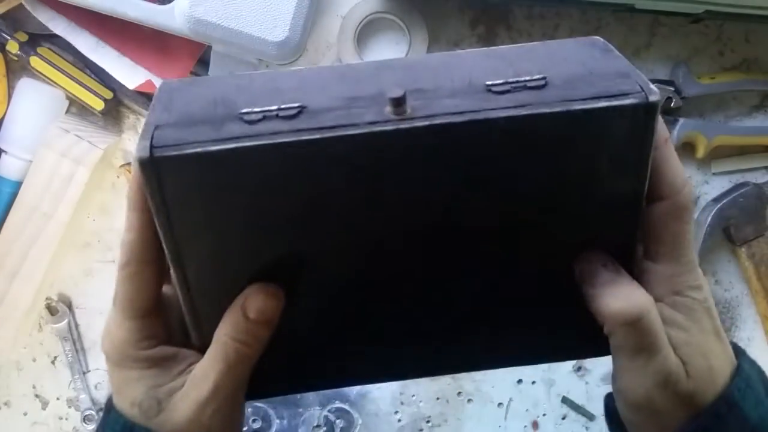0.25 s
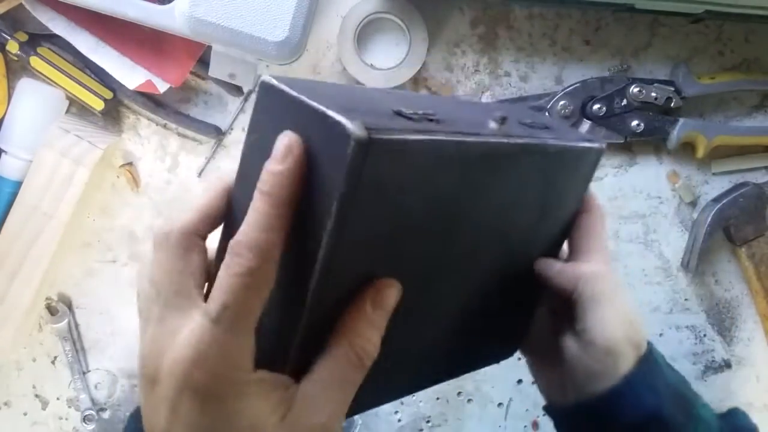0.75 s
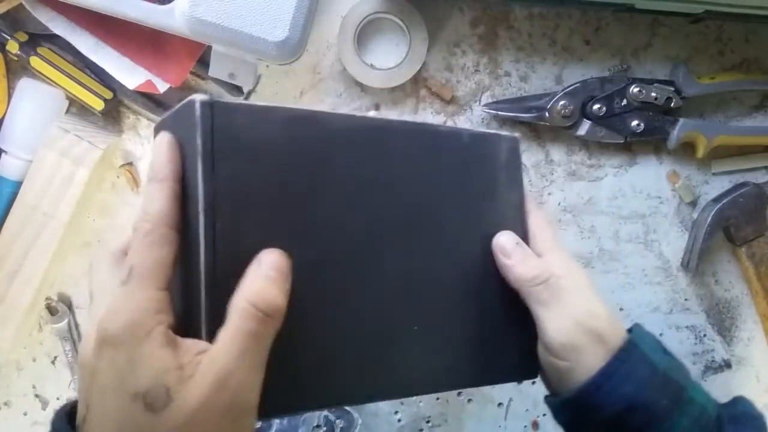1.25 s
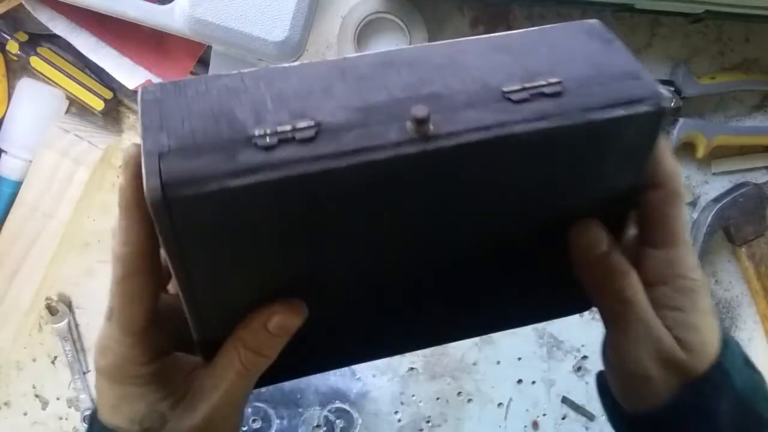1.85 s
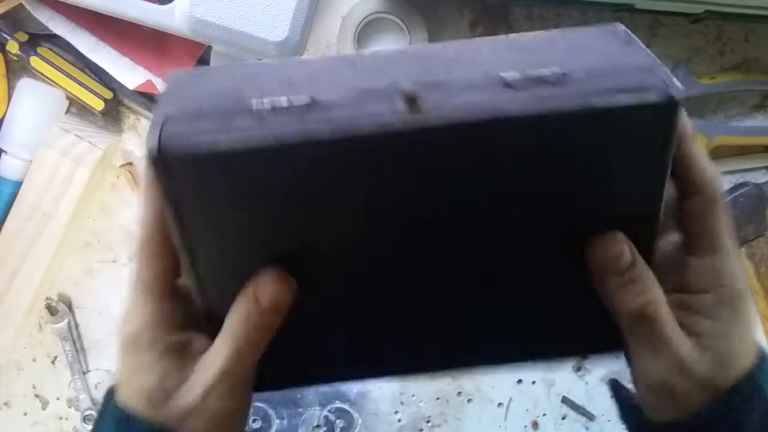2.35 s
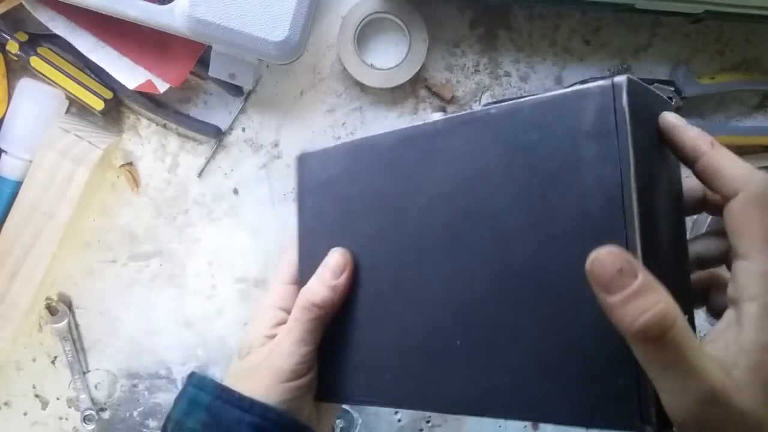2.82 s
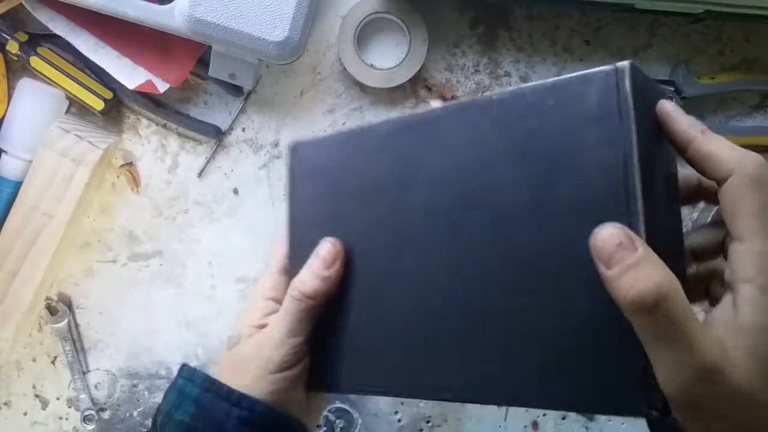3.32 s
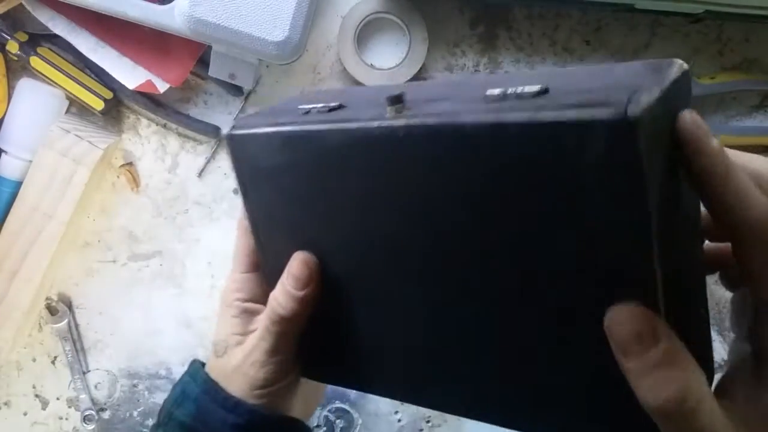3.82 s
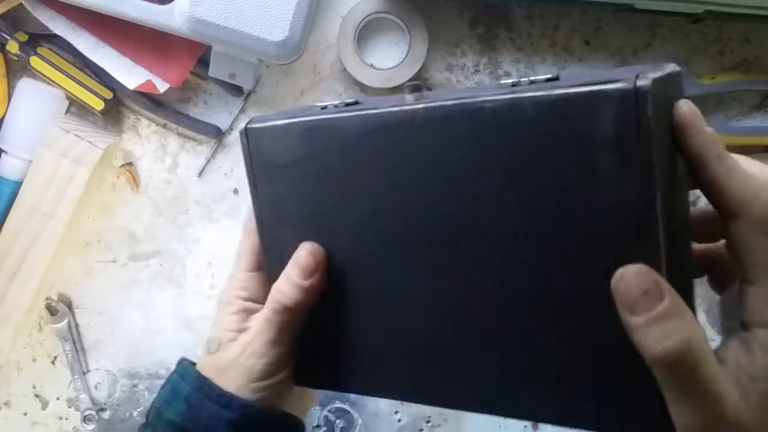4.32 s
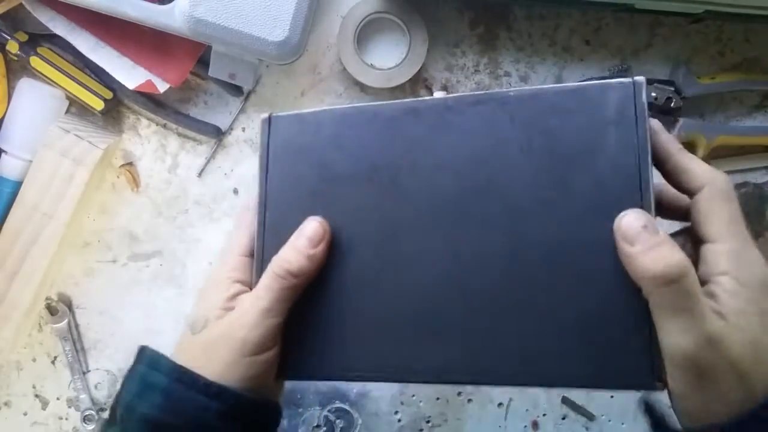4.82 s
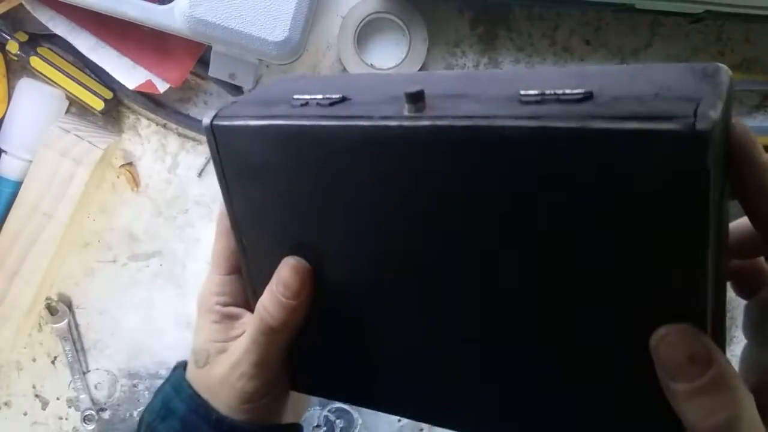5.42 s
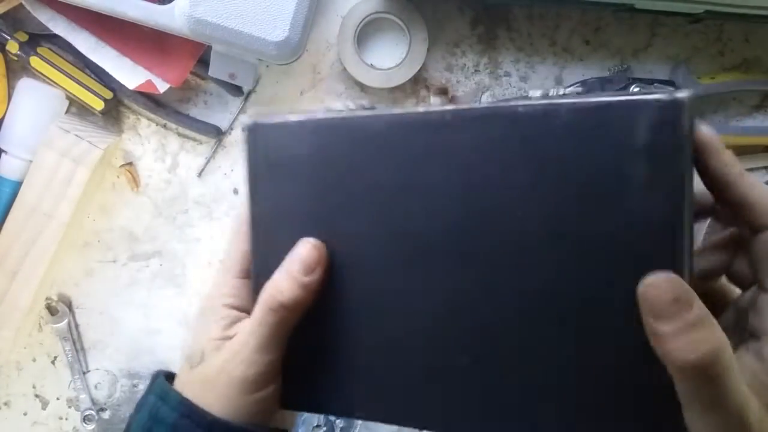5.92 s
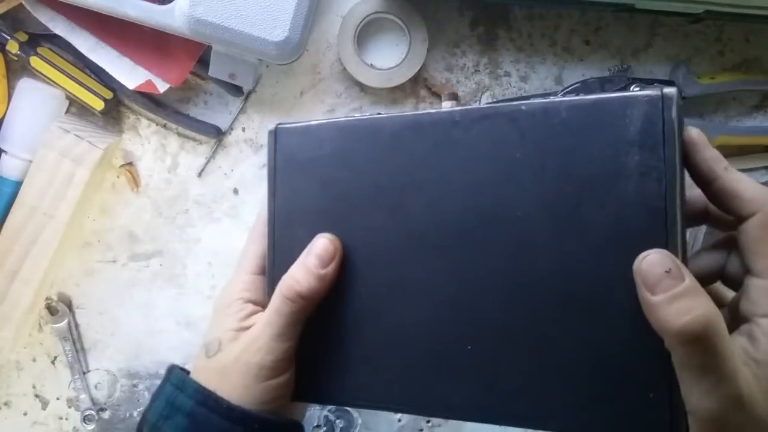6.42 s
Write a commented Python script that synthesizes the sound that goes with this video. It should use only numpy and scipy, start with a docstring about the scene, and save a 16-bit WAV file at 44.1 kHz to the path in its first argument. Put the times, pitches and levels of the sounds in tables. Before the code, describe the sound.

Close, dry woody clicks and short rumbling rolls of a little ball inside a tilted wooden box, with brief pauses and faint finger bumps.

```python
"""A fine rattle and woody clicks: a small ball runs through a maze in a wooden box tilted by two hands.
Contacts are bursts shaped by the struck spot, the panels and the hollow; rolling is a run of tiny taps.
Fingers bump the shell (decaying low tones and noise) and rub it (narrow-band noise).
Behind lie the quiet noise and weak hum of a workshop; near mono, with a mild noise suppressor."""
import sys
import numpy as np
from scipy import signal
from scipy.fft import rfft, irfft, next_fast_len
from scipy.io import wavfile
from scipy.ndimage import uniform_filter1d, map_coordinates

SR = 44100
rng = np.random.default_rng(int(sys.argv[2]) if len(sys.argv) > 2 else 0)


def inscribe(sig):
    """Save sig as 16-bit PCM at rate SR to the path in sys.argv[1].

    A 1-D sig is mono; a 2-D sig holds one channel per row.
    Samples are clipped to [-1, 1] before scaling.
    """
    pcm = np.round(np.clip(np.atleast_2d(sig).T, -1, 1) * 32767)
    wavfile.write(sys.argv[1], SR, pcm.astype(np.int16))


N = 293706
TIME = np.arange(N) / SR


def amp(db):
    """Amplitude factor of a level in dB."""
    return 10 ** (np.asarray(db) / 20)


def unit(x):
    """x scaled to an RMS of 1."""
    return x / np.sqrt(np.mean(x ** 2) + 1e-20)


def along(points, hz):
    """Interpolate (Hz, value) points on a log frequency axis."""
    point_hz, values = np.transpose(points)
    return np.interp(np.log(hz + 1), np.log(point_hz + 1), values)


def filtered(x, gain):
    """x times a gain that depends on frequency."""
    size = next_fast_len(len(x) + SR // 8)
    spectrum = rfft(x, size) * gain(np.fft.rfftfreq(size, 1 / SR))
    return irfft(spectrum, size)[:len(x)]


def causal(gain):
    """The minimum-phase response with this gain: it rings only after the blow."""
    cepstrum = irfft(np.log(np.maximum(gain, 1e-6)))
    half = len(cepstrum) // 2
    cepstrum[1:half] *= 2
    cepstrum[half + 1:] = 0
    return np.exp(rfft(cepstrum))


def wobble(knots_per_s):
    """A smooth random curve through normally distributed knots."""
    coarse_s = TIME[::32]
    knots = rng.standard_normal(int(N * knots_per_s / SR) + 4)
    return np.interp(TIME, coarse_s, map_coordinates(knots, [coarse_s * knots_per_s]))


def add(track, start_s, sound):
    """Lay a sound into the track at start_s."""
    part = track[max(round(start_s * SR), 0):][:len(sound)]
    part += sound[:len(part)]


def scatter(t, rise_s, life_s):
    """A blow spread by quick reflections in the wood: a short burst with a nearly even spectrum."""
    attack = 1 - np.exp(-t / rise_s)
    burst = rng.standard_normal(len(t)) * attack * np.exp(-t / life_s)
    spectrum = rfft(burst)
    even = irfft(spectrum / (abs(spectrum) + 1e-9) ** .7)
    even *= attack * np.exp(-(t / (4 * life_s)) ** 2)
    return even / np.linalg.norm(even)


def resonance(hz, centre_hz, width_hz, db):
    """A peak or dip of db over a flat response."""
    return 1 + (amp(db) - 1) / (1 + (2 * (hz - centre_hz) / width_hz) ** 2)


# Resonances of the panels and hollow. Each row: centre in Hz, width in Hz, nominal peak or dip in dB.
BOX_MODES = [(116, 40, 6.5), (393, 16, 2.5), (494, 40, 0.5), (603, 38, 1.5), (790, 35, 2.5), (900, 39, 6),
             (998, 95, 6), (1165, 100, -2.5), (1290, 77, 7), (1472, 75, 10), (1645, 90, -4.5),
             (1787, 90, 8.5), (2097, 98, 6.5), (2210, 33, 6.5), (2470, 52, 6.5), (2760, 90, 6.5),
             (2990, 110, -6.5), (3220, 150, 4.5), (3710, 480, 7), (4370, 140, 9.5), (4610, 160, 4.5),
             (4940, 160, 7), (5480, 120, 6.5), (5720, 140, -6.5), (5900, 350, 5.5)]


def box(hz):
    """Gain of the box: the product of its resonances, lowered by 3 dB."""
    return np.prod([resonance(hz, *mode) for mode in BOX_MODES], axis=0) * amp(-3.0)


# The ball strikes wood. Each row: first contact in seconds, level in dB, knock (near 1 kHz) in dB and
# hardness (near 6.5 kHz) in dB, both relative to the 2.4 kHz clack before the resonances,
# ring of the struck spot in Hz, rebounds (rounded), first flight in seconds.
STRIKES = [ (0.1404, -50.5, -2, -30.5, 2480, 1, .022), (0.251, -26.5, -7, -18, 2540, 3, .0366),
           (0.389, -50, 5, -36, 2490, 0, 0), (0.4078, -34.5, -7, -25, 2520, 0, 0),
           (0.427, -45, 8, -26, 2530, 1, .014), (0.4886, -47, -1.5, -36, 2520, 1, .042),
           (1.4056, -53, -4, -38, 1410, 0, 0), (1.4598, -45.5, -5.5, -35.5, 1460, 0, 0),
           (1.4928, -41, -5, -36, 1900, 1, .02), (1.5501, -36, -.5, -2.5, 3560, 0, 0),
           (1.5754, -34, -6, -31, 2336, 2, .0183), (1.7892, -53.5, -2.5, -36, 2530, 1, .038),
           (1.94, -27.5, -7.5, -14, 2520, 0, 0), (1.9745, -35, 0, -27, 3160, 2, .0224),
           (2.0792, -32, -4.5, -21, 2552, 0, 0), (2.159, -40, -2.5, -27, 2510, 2, .0454),
           (2.5842, -46.5, 5, -13, 3350, 0, 0), (3.006, -47.5, 0, -37, 2200, 0, 0),
           (3.0705, -40.5, 0, -20, 2200, 0, 0), (3.133, -28, -11, -9, 3300, 1, .0837),
           (3.1559, -44, -1, -30, 1550, 0, 0), (3.1876, -42.5, -5.5, -31, 1560, 0, 0),
           (3.2802, -39, -5.5, -17.5, 2120, -0.5, 0), (3.3575, -37.5, -2, -24.5, 2650, 0, 0),
           (3.3871, -47, 0, -26, 1260, 0, 0), (3.398, -30, -9, -4, 3940, 0, 0),
           (3.432, -42.5, -1.5, -17, 2630, 1, .0104), (3.517, -42.5, -2, -6.5, 3440, 2, .0664),
           (3.5437, -44.5, -1.5, -21, 2530, 0, 0), (3.92, -46.5, 3.5, -29.5, 2050, 0, 0),
           (3.9412, -34.5, -6, -13, 2440, 1, .0257), (4.04, -46, 1.5, -23, 1390, 0, 0),
           (4.0475, -34, -11.5, -11, 2630, 0, 0), (4.0851, -25, -6.5, -2, 6000, 0, 0),
           (4.1089, -35, -6, -27, 2440, 0, 0), (4.118, -25.5, -8, -14.5, 2444, 0, 0),
           (4.178, -32, -7, -5.5, 6030, 0, 0), (4.2648, -39, -1.5, -6, 2300, 1, .0532),
           (4.3355, -41.5, -1.5, -20.5, 2550, 1, .02), (4.6868, -44, -2, -43, 2080, 0, 0),
           (4.7365, -40.5, -3, -16, 3140, -0.5, 0), (4.7574, -36.5, -2.5, -29, 2060, 0, 0),
           (4.8205, -52.5, 1, -22, 1240, 0, 0), (4.87, -36.5, -3, -26, 1690, 1, .0157),
           (4.9207, -38.5, -1.5, -7, 1900, 2, .021), (4.963, -45, -6, -22, 1340, 1, .032),
           (5.0372, -43.5, 2.5, -10.5, 3040, 1, .011), (5.142, -55.5, 9, -35, 1760, 1, .026),
           (5.546, -49.5, -2, -34, 1610, 1, .008), (5.605, -51.5, -1.5, -44, 1420, 0, 0),
           (5.6673, -42, 1, -31.5, 2700, 0, 0), (5.693, -42, 0, -16, 2700, 0, 0),
           (5.6992, -30, -5, -8, 4700, 0.5, 0), (5.7252, -33.5, -2, -20, 2720, 0, 0),
           (5.7455, -38.5, -.5, -27, 2700, 0, 0), (5.7635, -44, -2, -15, 3650, 0, 0),
           (5.7987, -50, 3, -24, 2680, 0, 0), (5.9048, -41, 0, -11, 1890, 2, .019),
           (6.1835, -54.5, 1.5, -32, 1790, 0, 0), (6.3578, -39, 0, -5, 3080, 1.5, .0125),
           (6.594, -50, 4.5, -12.5, 1840, 1, 0)]
RESTITUTION, BOUNCE_LOSS_DB = .59, 5.5  # each flight over the one before; level lost a bounce
WALL_FLIGHT_S, WALL_SOFTENING_DB = .05, 2.5  # shortest first flight to the wall; hardness lost a return
DROP_S, DROP_LOSS_DB = .023, 14.5  # fall from the wall back to the floor
FLOOR_KNOCK_DB, FLOOR_HARDNESS_DB, FLOOR_RING_HZ = -2, -30.5, 1527
HOP_WANDER_OCT = .2  # each hop lands on another spot: spread of its ring


def contacts():
    """Rebounds at shrinking intervals: long flights return to the wall, short ones hop on the floor.

    Rows: seconds, dB, knock dB, hardness dB, ring Hz.
    """
    rows = []
    for start_s, db, knock_db, hardness_db, ring_hz, rebounds, flight_s in STRIKES:
        hopping = round(rebounds) > 0 and flight_s < WALL_FLIGHT_S
        for k in range(round(rebounds) + 1):
            when_s = start_s + flight_s * (1 - RESTITUTION ** k) / (1 - RESTITUTION)
            level_db = db - BOUNCE_LOSS_DB * k
            if hopping and k > 0:
                hop_hz = ring_hz * 2 ** (HOP_WANDER_OCT * rng.standard_normal())
                rows.append((when_s, level_db, FLOOR_KNOCK_DB, FLOOR_HARDNESS_DB, hop_hz))
            else:
                softened_db = hardness_db - WALL_SOFTENING_DB * k
                rows.append((when_s, level_db, knock_db, softened_db, ring_hz))
            if not hopping:
                rows.append((when_s + DROP_S, level_db - DROP_LOSS_DB,
                             FLOOR_KNOCK_DB, FLOOR_HARDNESS_DB, FLOOR_RING_HZ))
    return rows


# Decay of the hollow. Each row: frequency in Hz, time to fall 60 dB in seconds.
HOLLOW_DECAY = [(150, 0.1), (600, .15), (1500, 0.084), (3000, 0.09), (6000, .11), (12000, 0.14)]


def afterring(size):
    """The hollow box and the bench answer; each frequency dies at its own speed."""
    hz, t, bins = signal.stft(rng.standard_normal(size), SR, nperseg=256)
    decay = amp(-60 * t / along(HOLLOW_DECAY, hz)[:, None])
    tail = signal.istft(bins * decay, SR, nperseg=256)[1][:size]
    tail *= 1 - np.exp(-np.arange(size) / SR / 0.0044)
    return tail / np.linalg.norm(tail)


# Harder contacts are brighter. Each row: hardness in dB, colour at 4.3 kHz in dB.
EDGE_BY_HARDNESS = [(-36.5, -22.5), (-32.5, -14), (-22, -4.5), (0, -3)]
# Crack of a contact. Each row: hardness in dB, crack in dB over the contact level, before its filter.
CRACK_BY_HARDNESS = [(-30, -16), (-15, -3), (-7.5, 9.5), (-2, 0)]


def clicks(size=5120):
    """Each contact rings the struck spot and then the whole box; harder contacts are brighter."""
    track, t, hz = np.zeros(N), np.arange(size) / SR, np.fft.rfftfreq(size, 1 / SR)
    body = box(hz)
    panels = causal(body ** .75)
    hollow_colour = [(90, 1.5), (250, -2.5), (700, -3.5), (1500, -3), (3000, -5), (7000, -9.5), (12000, -3)]
    hollow = causal(body * amp(along(hollow_colour, hz)))
    treble = causal(amp(along([(6000, -19.5), (10000, 0.5), (13000, 0.5), (16000, -2)], hz)))
    for start_s, db, knock, hardness, ring_hz in contacts():
        edge = np.interp(hardness, *np.transpose(EDGE_BY_HARDNESS))
        boom = knock / 2 - 11 - 0.25 * (db + 34.0)  # the low boom grows more slowly than the clack
        colour = [(35, -43.0), (85, boom), (220, boom - 3), (480, knock - 2), (950, knock),
                  (1200, knock / 2 - 3), (1700, -3.5), (2400, 0), (4300, edge), (6500, hardness),
                  (8200, hardness - 4.5), (10000, -32 + hardness / 5), (15500, -33 + hardness / 5)]
        spot = causal(amp(along(colour, hz)) * resonance(hz, ring_hz, width_hz=290, db=8.5))
        blow = irfft(rfft(scatter(t, rise_s=0.00044, life_s=0.0033)) * spot * panels)
        tail = irfft(rfft(afterring(size)) * spot * hollow)
        contact = blow + tail
        attack_rms = np.sqrt(np.mean(contact[:SR // 125] ** 2))  # first 8 ms
        add(track, start_s, amp(db) * contact / attack_rms)
        crack_db = db + np.interp(hardness, *np.transpose(CRACK_BY_HARDNESS))
        crack = irfft(rfft(scatter(t, rise_s=.0001, life_s=.0007)) * treble)
        add(track, start_s, amp(crack_db) * crack)
    return track


def rattle(colour, hops_per_s, spread_db, smooth, woody):
    """The ball hops over the wood grain: a run of tiny taps of uneven size and spacing into the box."""
    size = 2 * next_fast_len(N // 2 + SR // 8)
    hz = np.fft.rfftfreq(size, 1 / SR)
    hop_count = np.cumsum(hops_per_s * amp(3 * wobble(90))) / SR
    hops = np.diff(np.floor(hop_count), prepend=0)
    tap_sizes = amp(spread_db * np.clip(rng.standard_normal(N), -2, 2))
    taps = hops * tap_sizes * np.sign(rng.standard_normal(N))
    drive = unit(taps) + smooth * rng.standard_normal(N)
    # the floor panel spreads each tap over a few milliseconds without changing its colour
    burst = scatter(np.arange(2 * (SR // 60)) / SR, rise_s=.0004, life_s=.0013)
    spread = np.exp(1j * np.angle(rfft(burst, size)))
    response = causal(amp(along(colour, hz)) * box(hz) ** woody)
    return unit(irfft(rfft(drive, size) * spread * response)[:N])


# Colour of the rumble before the box. Each row: frequency in Hz, relative level in dB.
RUMBLE_COLOUR = [(40, -28.5), (90, -1.5), (250, -10), (500, 0.5), (1000, 0), (1600, -1), (2200, -7),
                 (3000, -16), (5000, -42), (9000, -63.5)]
# Colour of the rasp before the box. Each row: frequency in Hz, relative level in dB.
RASP_COLOUR = [(1500, -43.5), (2500, 3), (3200, -2.5), (4300, -17.5), (5500, -24.5), (9000, -44)]
# Each tilt sends the ball down a corridor. Each row: start in seconds, top speed in seconds,
# stop in seconds, rolling in dB, rasp in dB, low hollow tone in Hz, high hollow tone in Hz.
TILTS = [ (.07, .18, .345, -52, -62, 540, 915), (1.288, 1.468, 1.62, -52.5, -66, 765, 2300),
         (1.749, 1.86, 2.13, -59, -70.5, 532, 2486), (2.9, 3.01, 3.32, -53.5, -85, 339, 1617),
         (3.805, 3.928, 4.21, -53, -73, 1327, 2163), (4.61, 4.722, 4.78, -57.5, -80, 1406, 2088),
         (5.413, 5.676, 5.8, -55, -72, 1080, 1340), (5.97, 6.3, 6.41, -61.5, -81.5, 990, 1220)]
SPEED_POWER, COAST_DB_PER_S, STOP_S = 0.93, 8.5, .03  # loudness over speed; fade after top; time to halt


def rolling():
    """The ball gathers speed evenly as the box tips, coasts with a slow fade and comes to rest."""
    level, rasp, t = np.zeros(N), np.zeros(N), np.arange(SR) / SR
    for start_s, top_s, stop_s, roll_db, rasp_db, _, _ in TILTS:
        gathering = np.clip(t / (top_s - start_s), 0, 1)
        stopping = np.clip((stop_s - start_s - t) / STOP_S + .5, 0, 1)
        coasting = amp(-COAST_DB_PER_S * np.maximum(start_s + t - top_s, 0))
        motion = (gathering * stopping) ** SPEED_POWER * coasting
        add(level, start_s, motion * amp(roll_db))
        add(rasp, start_s, motion * amp(rasp_db))
    rumble = rattle(RUMBLE_COLOUR, hops_per_s=105, spread_db=3.3, smooth=.15, woody=1.1)
    return level * rumble + rasp * rattle(RASP_COLOUR, hops_per_s=90, spread_db=2.5, smooth=.3, woody=0.82)


LOW_TONE_DB, HIGH_TONE_DB = 7.5, 4.5  # boost of a corridor's two hollow tones


def corridors(ball, width_hz):
    """The corridor that the ball is in rings along with it until the next tilt."""
    voiced = ball.copy()
    ends_s = [row[0] for row in TILTS[1:]] + [N / SR]
    for (start_s, *_, low_hz, high_hz), end_s in zip(TILTS, ends_s):
        inside = ball[max(round(start_s * SR), 0):round(end_s * SR)]
        for hz, db in (low_hz, LOW_TONE_DB), (high_hz, HIGH_TONE_DB):
            tone = signal.lfilter(*signal.iirpeak(hz, hz / width_hz, SR), inside)
            add(voiced, start_s, (amp(db) - 1) * tone)
    return voiced


def squeak(centre_hz, size):
    """Skin dragging on the shell: a narrow, breathy tone."""
    half_width_hz = 0.028 * centre_hz + 20
    noise = rng.standard_normal(size)
    return unit(filtered(noise, lambda hz: 1 / (1 + ((hz - centre_hz) / half_width_hz) ** 2)))


# The shell under a soft finger. Each row: tone in Hz, relative level in dB.
SHELL_TONES = [(110, -7.5), (161, -3), (294, 1), (420, -7)]
# Fingers bump the shell. Each row: start in seconds, nominal level in dB.
BUMPS = [(0.557, -53.5), (0.782, -55), (1.051, -44), (3.073, -42)]
# Fingers slide on the shell. Each row: start in seconds, end in seconds, main squeak in dB, its centre in Hz.
RUBS = [(2.45, 2.58, -68, 2480), (2.71, 2.86, -67.5, 600)]
# Further squeaks of the skin. Each row: centre in Hz, level in dB relative to the main squeak.
WHISTLES = [(1960, -12), (3840, -7.5), (4800, -16)]


def hands():
    """Finger bumps sound low shell tones and a pat of noise; slides on the shell squeak faintly."""
    track, t = np.zeros(N), np.arange(SR // 8) / SR
    thud = sum(amp(db) * np.sin(2 * np.pi * hz * t) for hz, db in SHELL_TONES)
    for start_s, db in BUMPS:
        pat = unit(filtered(rng.standard_normal(len(t)), lambda hz: box(hz) / (1 + (hz / 2500) ** 2)))
        envelope = amp(db - 60 * t / 0.061) * (1 - np.exp(-t / 0.0028))  # falls 60 dB in 61 ms
        add(track, start_s, envelope * (thud + amp(-11.5) * pat))
    for start_s, end_s, db, centre_hz in RUBS:
        size = round((end_s - start_s) * SR)
        slide = squeak(centre_hz, size) + sum(amp(level) * squeak(hz, size) for hz, level in WHISTLES)
        add(track, start_s, amp(db) * slide * signal.windows.tukey(size))
    return track


# Colour of the room noise and hiss. Each row: frequency in Hz, relative level in dB.
QUIET_COLOUR = [(12, -31), (20, -9.5), (32, -27), (77, -2), (120, -3.5), (222, -10), (270, -14), (410, -13),
                (1060, -18.5), (1810, -20.5), (2320, -25), (3840, -27.5), (5080, -30.5), (13900, -25),
                (16000, -26.5)]
# Faint hum of the room. Each row: frequency in Hz, mean level in dB.
HUM = [(97, -77), (146, -77), (231, -81), (371, -81)]


def workshop():
    """Low room noise and microphone hiss as coloured noise, with a weak, slightly wavering hum."""
    air = unit(filtered(rng.standard_normal(N), lambda hz: amp(along(QUIET_COLOUR, hz))))
    hum = sum(amp(db + 0.87 * wobble(4.7)) * np.sin(2 * np.pi * hz * TIME + 0.54 * wobble(2.2))
              for hz, db in HUM)
    return amp(-61.0 + 0.4 * wobble(5.4)) * air + hum


def scene():
    """The two channels are nearly the same; a faint, short scattered copy of the sound differs between them."""
    sound = corridors(clicks() + rolling(), width_hz=61) + hands()
    mid = sound + workshop()
    spread = scatter(np.arange(2 * (SR // 200)) / SR, rise_s=.0002, life_s=.0008)
    side = amp(-30) * signal.fftconvolve(sound, spread)[:N]
    return np.array([mid + side, mid - side])


def suppressor(x, threshold_db, depth_db, hold_s):
    """Gain sinks while the middle range is quiet."""
    middle = filtered(x, lambda hz: (hz > 500) & (hz < 6000))
    power = abs(uniform_filter1d(middle ** 2, max(int(hold_s * SR), 1)))
    return x * amp(-depth_db / (1 + power / amp(threshold_db) ** 2))


TOP_HZ = 16100


def record(dry):
    """The recorder turns down quiet moments and keeps nothing above its band limit."""
    channels = [suppressor(x, threshold_db=-54.5, depth_db=8.5, hold_s=0.014) for x in dry]
    return np.array([filtered(x, lambda hz: hz < TOP_HZ) for x in channels])


dry = scene()
out = record(dry)
inscribe(out)
```